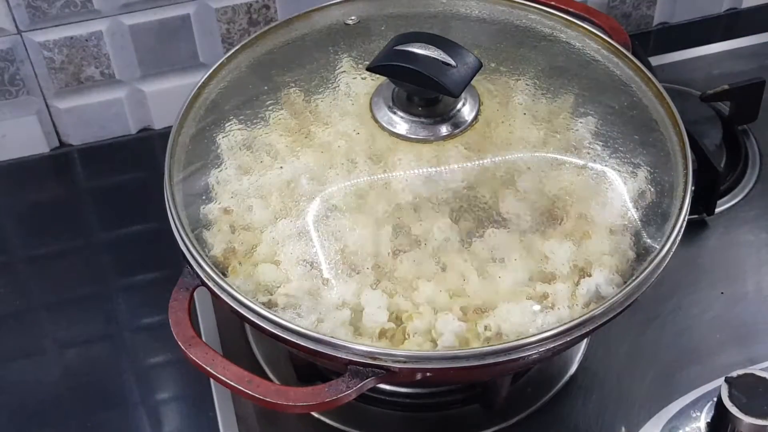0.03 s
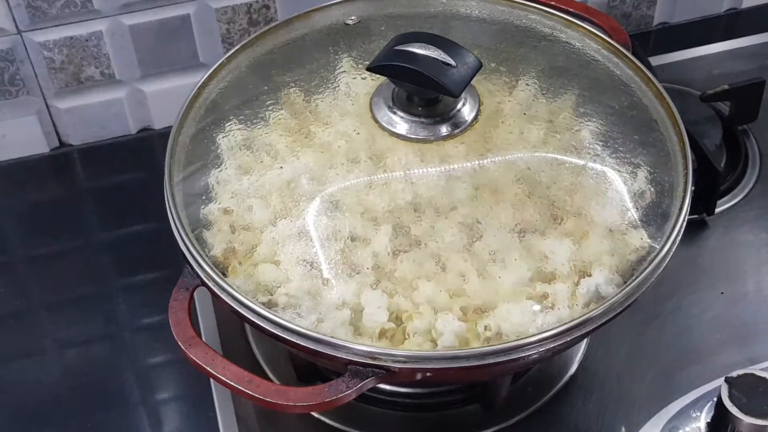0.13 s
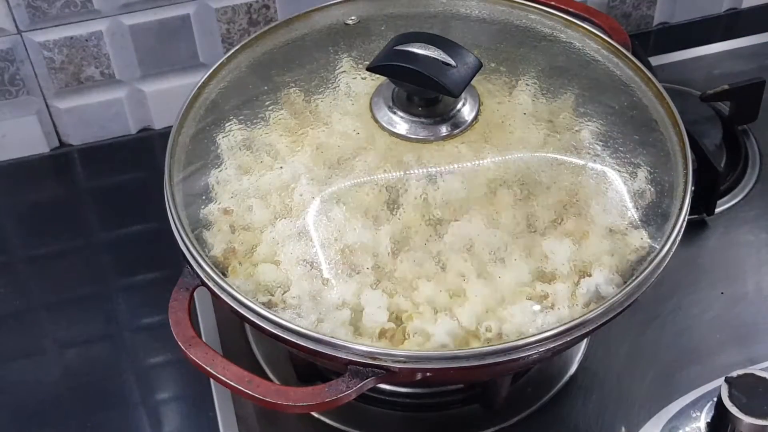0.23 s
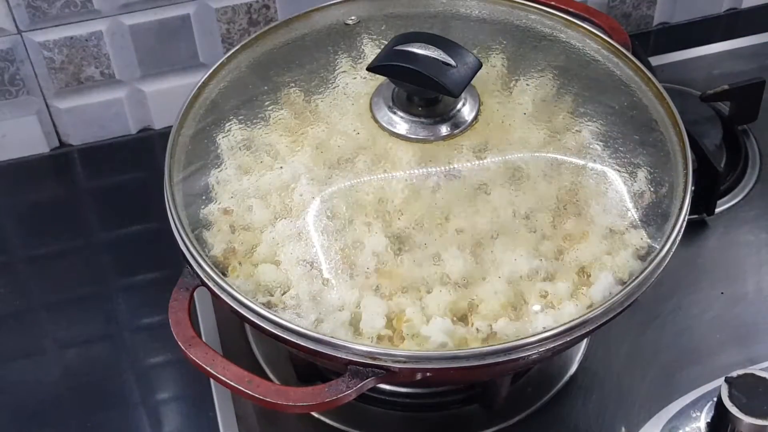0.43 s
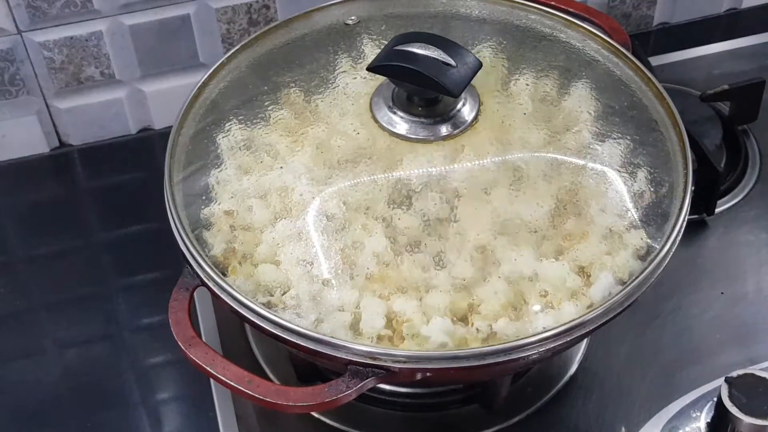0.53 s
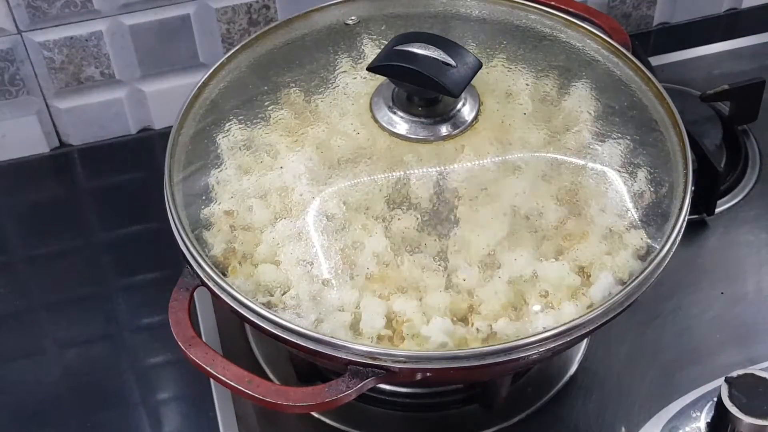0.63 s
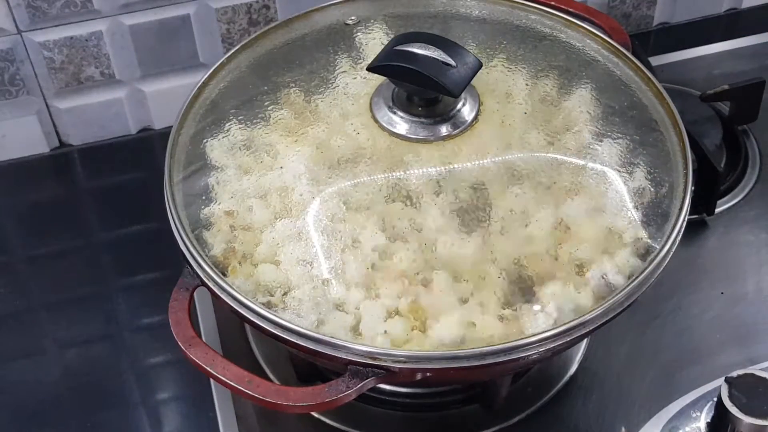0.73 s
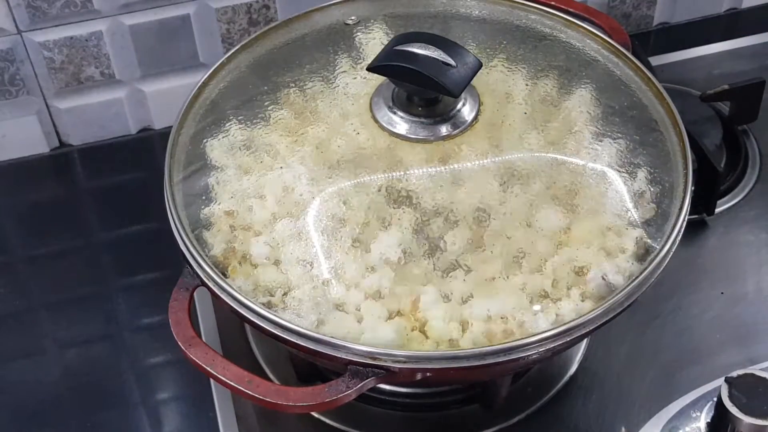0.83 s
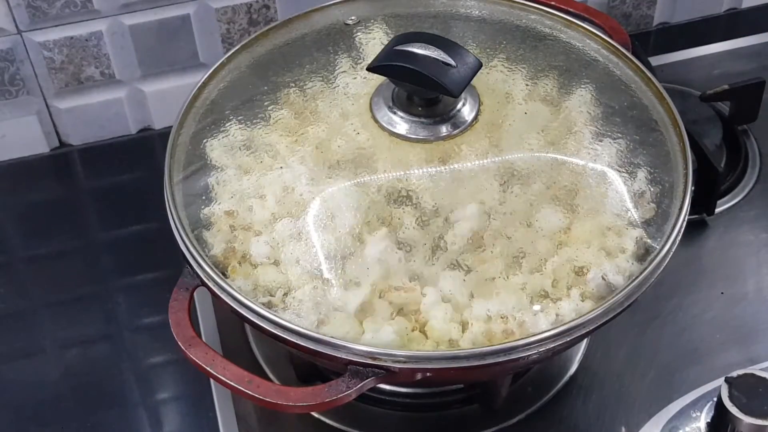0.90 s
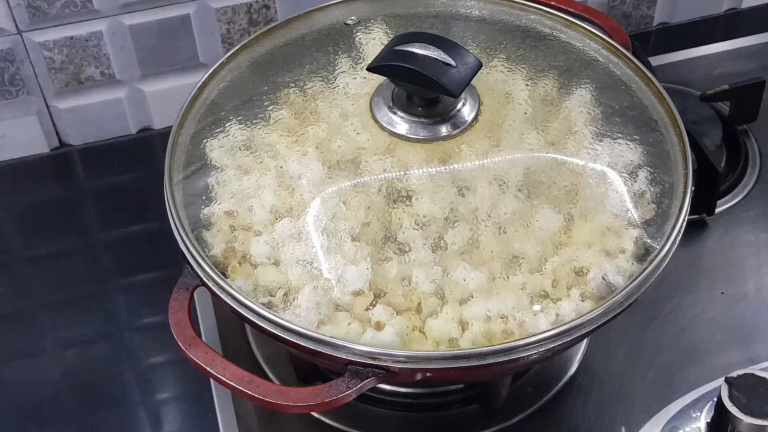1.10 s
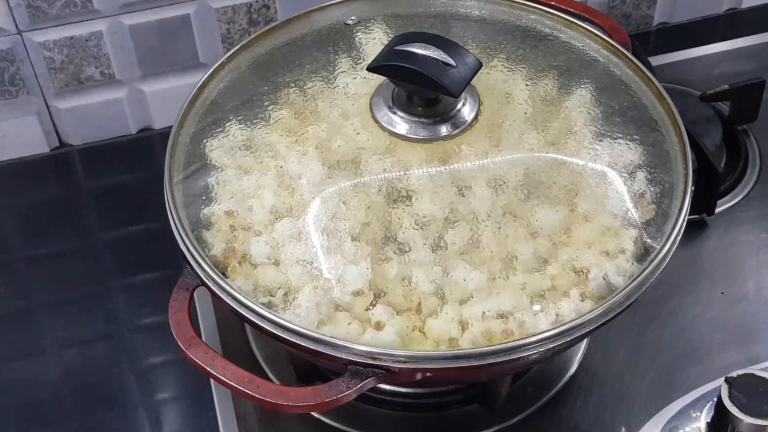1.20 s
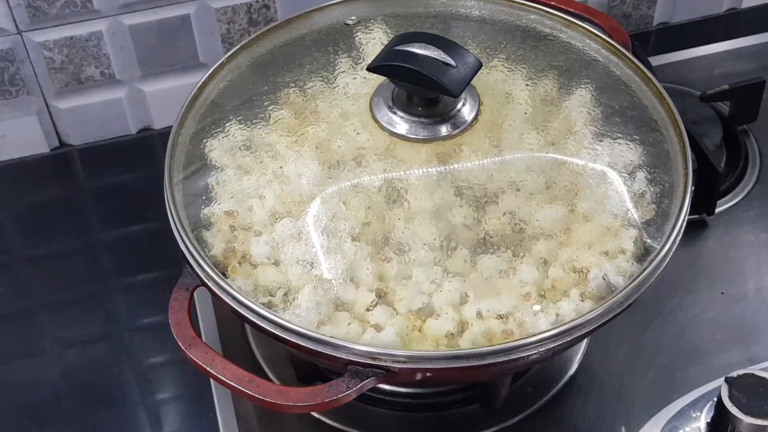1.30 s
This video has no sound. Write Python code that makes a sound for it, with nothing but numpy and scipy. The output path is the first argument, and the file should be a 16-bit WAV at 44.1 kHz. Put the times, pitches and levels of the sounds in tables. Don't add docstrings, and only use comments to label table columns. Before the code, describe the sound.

Popping popcorn raps hard on a pot lid, a quick volley that thins to weak ticks

```python
import sys
import numpy as np
from scipy import signal
from scipy.fft import rfft, irfft
from scipy.io import wavfile
from scipy.ndimage import uniform_filter1d, minimum_filter1d

SR = 44100
rng = np.random.default_rng(int(sys.argv[2]) if len(sys.argv) > 2 else 0)


def output_pcm(signal):
    pcm = np.clip(np.atleast_2d(signal).T, -1, 1) * 32767
    wavfile.write(sys.argv[1], SR, np.round(pcm).astype(np.int16))


def volts(x):
    e = np.asarray(x, float) / 20
    return 10 ** e


N = 59535
T = np.arange(N) / SR

# (time [s], crack level [dB], crack centre [Hz], lid ring level [dB], wall ring level [dB])
KNOCKS = [(0.169, -18.5, 1550, -32, -48), (.2146, -17.5, 3120, -29, -26), (0.386, 0, 1290, 1, -25),
          (0.429, -15, 5450, -45, -33), (0.4629, -28, 5000, -46, -36), (0.4655, -6.5, 4570, -14, -30),
          (0.4686, -9, 2370, -30, -31), (.579, -17, 2780, -50, -24), (0.6928, -6, 4800, -14.5, -27),
          (.7005, -8.5, 4600, -33, -28), (0.7395, -5, 3540, -42, -4.5), (0.812, -14.5, 2420, -28.5, -29),
          (0.8432, -17.5, 2880, -38, -11), (0.872, -16.5, 2600, -41, -37), (.9088, -25, 3420, -61, -26),
          (1.051, -27, 4220, -35, -39), (1.0805, -30, 2470, -42.5, -49)]
# (frequency [Hz], level [dB], time to fall 60 dB [s])
LID_MODES = [(1545, -17.5, 0.076), (1986, -6, 0.051), (2550, -18, 0.06), (3086, -12, 0.05),
             (3533, -7.5, 0.062), (3962, -4, .045), (4370, -8, .06), (4680, -17.5, 0.049),
             (5000, -11, 0.038), (5720, -14.5, 0.03), (5922, -17, 0.034), (6930, -17.5, 0.05),
             (7470, -21, 0.032), (8160, -17.5, 0.054)]
# (frequency [Hz], level [dB], time to fall 60 dB [s])
WALL_MODES = [(1233, -21, 0.15), (1740, -22, 0.11), (2280, -19, .1), (2760, -17, 0.12), (2880, -27, 0.11),
              (3070, -20, .06), (3644, -8, 0.068), (4296, -20, 0.062), (4420, -17, 0.065),
              (4635, -28, 0.06), (5280, -12.5, 0.11), (5420, -12, 0.042), (5500, -16, .04)]
# (frequency [Hz], level per Hz [dB])
BODY_COLOUR = [(410, -5), (700, -11), (1100, -13), (1220, -10.5), (1450, -8.5), (2020, -4), (2840, -7),
               (4590, -6), (9000, -33), (11700, -59), (19800, -120)]


def unit(x):
    return x / np.sqrt(np.mean(x ** 2))


def coloured(x, points):
    freqs = np.maximum(np.fft.rfftfreq(N, 1 / SR), 1)
    points = np.array(points)
    level = np.interp(np.log(freqs), np.log(points[:, 0]), points[:, 1], -90 + points[0, 1], -90)
    return unit(irfft(rfft(x) * volts(level), N))


def band(x, hz, width):
    return signal.lfilter(*signal.iirpeak(hz, hz / width, SR), x)


def highpass(x, hz, order):
    return signal.lfilter(*signal.butter(order, hz, "high", fs=SR), x)


def fade(at, t60, hold=0., rise=0.00011):
    t = T - at
    fall_db = -60 * np.clip(t - hold, 0, 2) / max(t60, .004)
    return np.clip(t / rise, 0, 1) * volts(fall_db)


def placed(at, x):
    return np.pad(x, (int(at * SR), N))[:N]


def kitchen(x):
    t60_s = .3
    t = T[:SR // 2]
    tail = band(rng.standard_normal(len(t)), 3300, 9000) * volts(-60 * t / t60_s)
    tail = tail * (t > .002)
    return signal.fftconvolve(x, tail / np.sqrt(np.sum(tail ** 2)))[:N]


def stove():
    # (frequency [Hz], level per Hz [dB])
    burner_colour = [(30, -3), (100, -17.5), (175, -6), (450, 4), (1000, -17.5), (3000, -13.5),
                     (7500, -25.5), (15500, -21)]
    return volts(-51) * coloured(rng.standard_normal(N), burner_colour)


def rustle():
    level_db, ring_db, t60_s = -24, -10, 0.46
    ticks_per_s, spread_db = 1500, 2
    ticks = (rng.random(N) < ticks_per_s / SR) * rng.standard_normal(N)
    ticks = ticks * volts(spread_db * rng.exponential(size=N))
    ticks = signal.lfilter([1], [1, -.99], np.abs(ticks)) * rng.standard_normal(N)
    rings = sum(volts(db / 3) * band(ticks, hz, 30) for hz, db, _ in LID_MODES + WALL_MODES)
    power = 0
    for at, crack_db, _, lid_db, wall_db in KNOCKS:
        strength = volts(max(crack_db, lid_db, wall_db))
        power = power + (strength * fade(at, t60_s, 0, 0.0031)) ** 2
    grains = coloured(ticks, BODY_COLOUR) + volts(ring_db) * coloured(rings, BODY_COLOUR)
    return volts(level_db) * grains * np.sqrt(power)


def tumbles():
    # (time [s], level [dB], centre [Hz], time
    # to fall 60 dB [s])
    small_ticks = [(.0004, -36.5, 4970, 0.067), (.0006, -33.5, 2320, 0.062), (0.176, -37.5, 4280, 0.36),
                   (0.0357, -18.5, 2235, 0.03), (0.045, -41, 2290, 0.72), (0.091, -43.5, 4370, 0.087),
                   (0.251, -36, 2800, 0.03), (0.2228, -23, 2660, .025), (0.0325, -36.5, 3800, 0.029),
                   (.383, -33, 4000, .03), (.4615, -26, 5400, .025), (0.169, -27, 4300, 0.014),
                   (0.8434, -21, 4070, 0.0089), (0.486, -26, 2950, 0.033), (.4745, -10.5, 2480, .03),
                   (0.514, -32, 2660, 0.45), (0.548, -28, 2170, 0.25), (0.6223, -33, 2330, 0.16),
                   (.681, -25.5, 1950, 0.045), (0.722, -28, 2460, 0.046), (.767, -29, 4900, 0.012),
                   (.78, -36, 3320, 0.014), (0.932, -40, 4860, 0.068), (0.943, -44, 2350, 0.025),
                   (1.003, -36.5, 3000, 0.048), (1.014, -38, 2450, 0.073), (1.023, -42, 2350, 0.039),
                   (1.116, -50, 2600, 0.15), (1.138, -42.5, 3300, 0.068), (1.154, -46.5, 2550, 0.088),
                   (1.309, -41, 3140, 0.1), (1.32, -44.5, 3860, 0.063)]
    click_db, click_t60_s = -10, 0.0038
    noise = rng.standard_normal(N)
    out = 0
    for at, db, hz, t60 in small_ticks:
        push = noise * (fade(at, t60) + volts(click_db) * fade(at, click_t60_s))
        woody = 4 * band(band(push, hz, hz * 0.23), hz, hz * .5)
        dull = 0.22 * band(push, hz * 0.46, hz)
        out = out + volts(db) * (woody + dull)
    return out


def booms():
    # (time [s], hum level [dB], hum pitch [Hz], thud level [dB])
    air_pushes = [(0.17, -51.5, 400, -43.5), (0.23, -40, 330, -41), (0.231, -47.5, 750, -54),
                  (0.401, -22.5, 516, -30.5), (0.465, -45, 215, -70), (0.485, -33, 519, -34.5),
                  (0.577, -42, 1234, -50.5), (0.708, -28, 548, -34.5), (0.746, -28.5, 1227, -42.5),
                  (0.847, -37.5, 370, -49), (0.842, -40, 597, -69), (0.907, -44.5, 475, -71)]
    hum_t60_s, hum_hold_s, hum_width_hz = 0.029, 0.019, 210
    thud_hz, thud_t60_s, thud_lead_s = 138, 0.27, .012
    noise = rng.standard_normal(N)
    thud = unit(band(band(rng.standard_normal(N), thud_hz * 2.5, 325), thud_hz * 0.82, 540))
    out = 0
    for at, hum_db, hz, thud_db in air_pushes:
        hum = np.sin(2 * np.pi * hz * T) + 0.36 * unit(band(noise, hz, hum_width_hz))
        out = out + volts(hum_db) * hum * fade(at, hum_t60_s, hum_hold_s, 0.0048)
        out = out + volts(thud_db) * thud * fade(at - thud_lead_s, thud_t60_s, 0.012, 0.00094)
    return out


def steam():
    # (time [s], level [dB], length [s])
    puffs = [(0.024, -53.5, 0.016), (0.168, -34.5, 0.011), (0.181, -36.5, 0.024), (0.209, -37, 0.0023),
             (0.219, -32.5, 0.018), (.3862, -14, .014), (0.4595, -30.5, 0.042), (0.629, -50, 0.087),
             (0.6907, -36, 0.0096), (0.709, -42, 0.011), (0.722, -28.5, 0.0087), (0.733, -51.5, 0.0077),
             (0.793, -46, 0.16), (0.81, -45, 0.0086), (0.887, -45, 0.0037), (0.827, -49, 0.003),
             (0.931, -50, 0.091), (1.009, -60, 0.046), (1.11, -55.5, 0.04), (1.047, -42.5, 0.027),
             (1.277, -48.5, 0.0098)]
    # (frequency [Hz], level per Hz [dB])
    hiss_colour = [(2500, 3.5), (4000, -27), (5800, -1), (7000, -14.5), (8200, -12.5), (11000, -4.5),
                   (13500, -9), (16000, -13)]
    tail_db, tail_t60_s = -4, 0.11
    shape = 0
    for at, db, length in puffs:
        jet = fade(at, 2 * length, length / 2, 0.00047)
        shape = shape + volts(db - 5.0) * (jet + volts(tail_db) * fade(at, tail_t60_s))
    return coloured(rng.standard_normal(N), hiss_colour) * shape


def pings():
    # (time [s], frequency [Hz], level [dB], time to fall 60 dB [s])
    struck_modes = [(0.035, 2565, -34, 0.053), (.1695, 2260, -27.5, 0.011), (0.1673, 4210, -31, 0.027),
                    (0.173, 2500, -39, 0.43), (.174, 3960, -39, 0.24), (.178, 5760, -44, 0.18),
                    (0.2144, 2530, -25, 0.046), (0.2144, 4660, -32.5, 0.11), (.217, 3560, -29.5, 0.021),
                    (.2205, 1961, -31, 0.088), (.429, 5270, -23.5, 0.046), (.4616, 5400, -19.5, .02),
                    (0.4656, 4690, -14, 0.052), (.466, 3653, -14.5, 0.015), (0.4664, 5390, -21, 0.06),
                    (.469, 1972, -16.5, 0.073), (0.472, 2650, -16, 0.034), (0.48, 3106, -24, .12),
                    (.579, 2045, -30, .05), (.579, 3630, -35, .06), (.579, 4460, -31, 0.056),
                    (0.6924, 4695, -17.5, .067), (0.6922, 3973, -25, .1), (0.6911, 5250, -22, 0.12),
                    (.6925, 3307, -24.5, 0.091), (.696, 2554, -20, 0.072), (.696, 1974, -27, 0.065),
                    (.716, 2510, -27, .05), (0.7414, 5420, -23.5, 0.066), (.745, 4296, -23, 0.046),
                    (0.749, 2756, -26, 0.13), (.750, 2320, -26, .07), (.812, 2487, -26.5, 0.037),
                    (.814, 1545, -35, 0.24), (.812, 4370, -36, 0.068), (.8445, 3644, -20, 0.037),
                    (0.8453, 2742, -19.5, 0.03), (0.8444, 4450, -26, 0.036), (0.8438, 5440, -24, 0.041),
                    (.871, 2248, -29, 0.088), (0.873, 2775, -32, 0.11), (1.0032, 2416, -34, 0.046),
                    (1.0042, 1780, -39, 0.049), (1.0042, 3860, -39, .04), (1.0515, 4745, -37.5, 0.036),
                    (1.0506, 3958, -43, 0.12), (1.0512, 1973, -44.5, 0.16), (1.054, 5750, -44, 0.066),
                    (1.0797, 2520, -39, 0.059), (1.0797, 4100, -43, 0.049)]
    hold_s = 0.0027
    t = T[:SR // 4]
    out = 0
    for at, hz, db, t60 in struck_modes:
        tone = np.sin(2 * np.pi * hz * t) * fade(0, t60, hold_s)[:len(t)]
        out = out + placed(at, volts(db) * tone)
    return out


def ring(at, hz, db, modes, spot, hold):
    spot_db, detune, push_s = 1.2, .0015, .0008
    focus_db, focus_octaves = 9.5, 0.12
    t = T[:SR // 4]
    tone = 0
    for (mode_hz, mode_db, t60), (stronger, sharper, phase) in zip(modes, spot):
        focus = focus_db * np.exp(-(np.log2(mode_hz / hz) / focus_octaves) ** 2)
        fall_db = -60 * np.maximum(t - hold, 0) / np.clip(t60, .02, .13)
        level = volts(mode_db + spot_db * stronger + focus + fall_db)
        tone = tone + level * np.sin(2 * np.pi * mode_hz * (1 + detune * sharper) * t + 3 * phase)
    return placed(at, volts(db) * tone * (1 - np.exp(-t / push_s)) / 2)


def knocks():
    crack_t60_s, crack_low_hz, wide_db = 0.053, 1030, 3.5
    noise = rng.standard_normal(N)
    wide = volts(wide_db) * coloured(rng.standard_normal(N), BODY_COLOUR)
    spots = rng.standard_normal((len(KNOCKS), 2, 14, 3))
    cracks, rings = 0, 0
    for (at, db, hz, lid_db, wall_db), (lid_spot, wall_spot) in zip(KNOCKS, spots):
        narrow = unit(band(noise, hz, hz * 0.19))
        cracks = cracks + volts(db - 16.0) * (narrow + wide) * fade(at, crack_t60_s)
        rings = rings + ring(at, hz, lid_db, LID_MODES, lid_spot, hold=0.01)
        rings = rings + ring(at, hz, wall_db, WALL_MODES, wall_spot, hold=.002)
    return highpass(cracks, crack_low_hz, 2) + rings


def scene():
    room_db, side_db, side_top_db, stove_side_db = -18, -27, -19, -15
    pan_db = -1
    pot = knocks() + pings() + tumbles() + rustle() + steam() + booms()
    mid = pot + volts(room_db) * kitchen(pot) + stove()
    smear = rng.standard_normal(900) * np.exp(-np.arange(900) / 250)
    smear = smear / np.sqrt(np.sum(smear ** 2))
    scattered = signal.fftconvolve(pot + 2 * booms(), smear)[:N]
    side = volts(side_db) * scattered + volts(side_top_db) * highpass(scattered, 7000, 1)
    side = side + volts(stove_side_db) * stove()
    return np.array([mid + side, mid - side]) * volts(np.array([[pan_db], [-pan_db]]) / 2)


def top_cut(x):
    return signal.sosfilt(signal.butter(12, 16620, fs=SR, output="sos"), x)


def record(dry):
    ceiling, release_s, top_hz = .6, .003, 15750
    gain = np.minimum(1, ceiling / (np.abs(dry).max(axis=0) + 1e-9))
    duck = np.log(uniform_filter1d(minimum_filter1d(gain, size=40), size=20))
    keep = np.exp(-1 / (release_s * SR))
    slow = signal.lfilter([1 - keep], [1, -keep], duck)
    limited = dry * np.exp(np.minimum(duck, slow))
    clipped = .5 * np.tanh(2 * limited)
    mix = signal.sosfilt(signal.ellip(8, .2, 70, top_hz, fs=SR, output="sos"), clipped)
    return top_cut(mix)


dry = scene()
out = record(dry)
output_pcm(out)
```